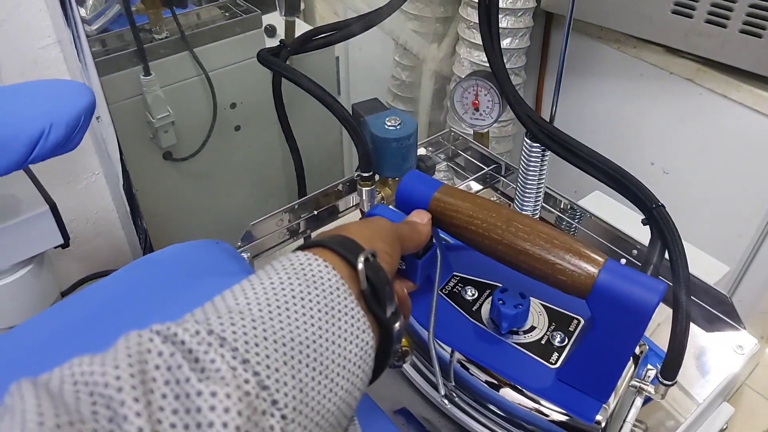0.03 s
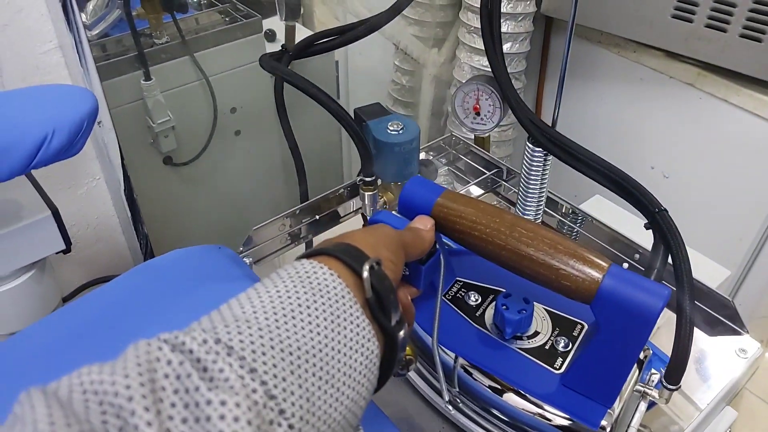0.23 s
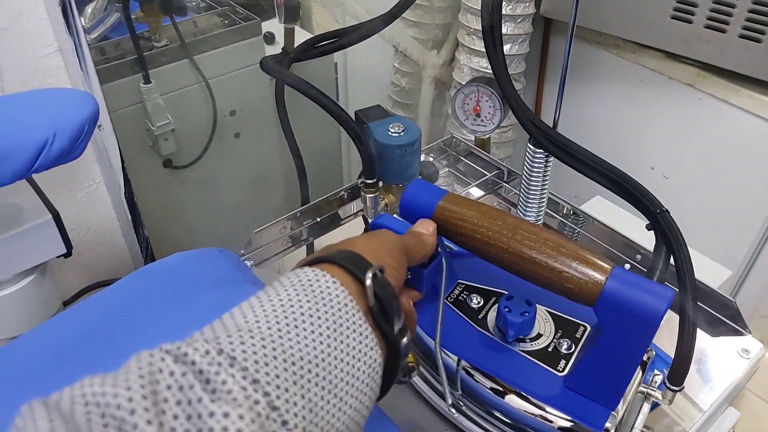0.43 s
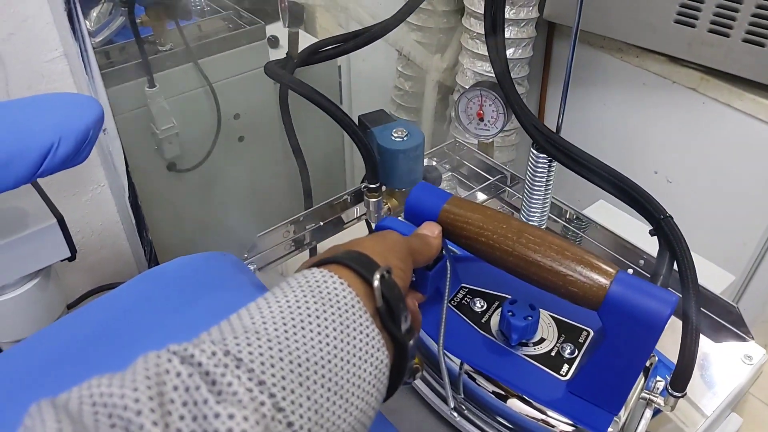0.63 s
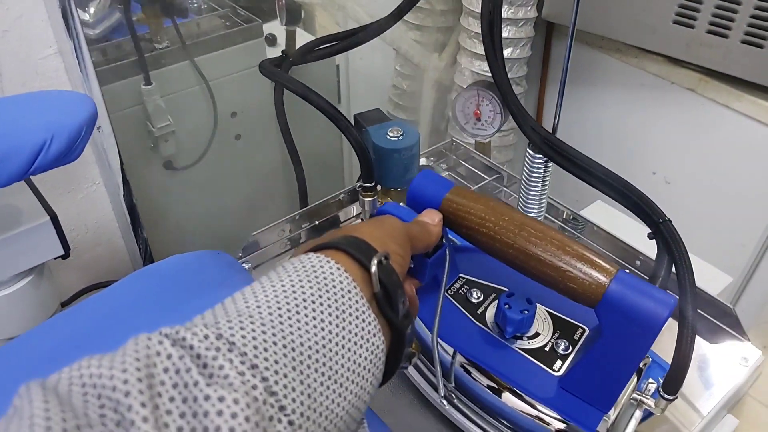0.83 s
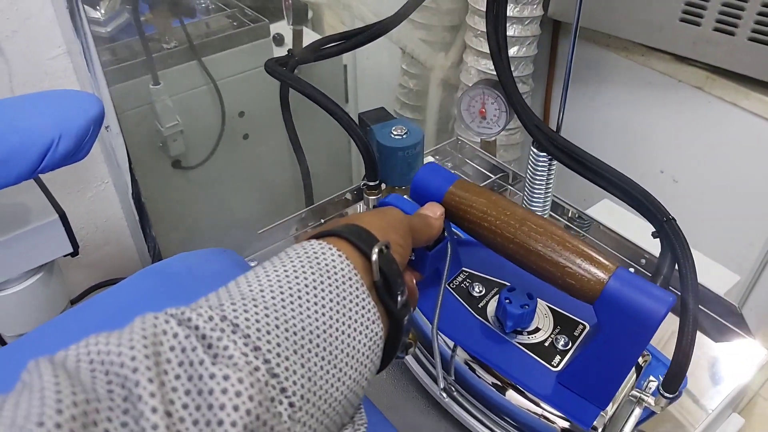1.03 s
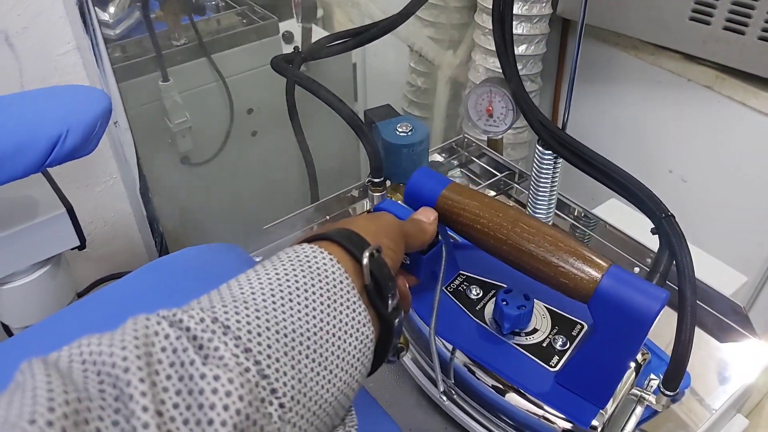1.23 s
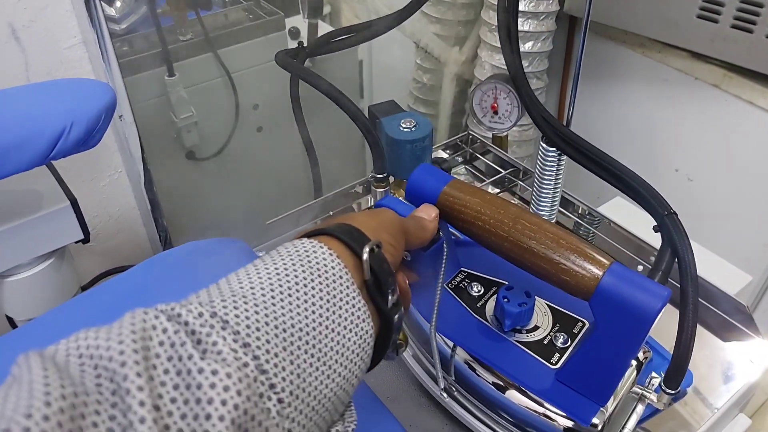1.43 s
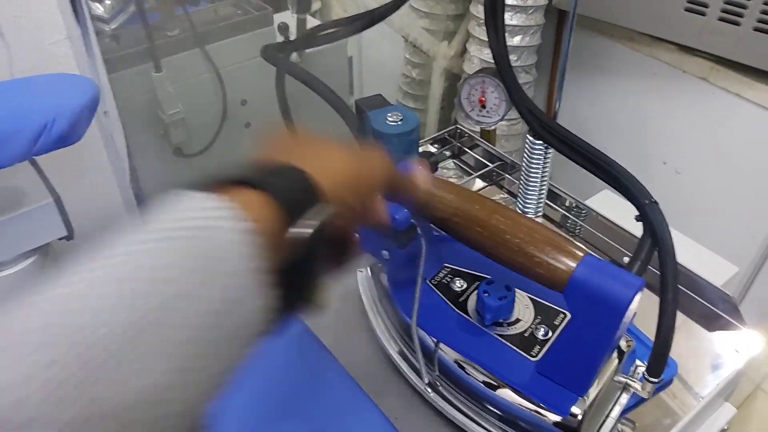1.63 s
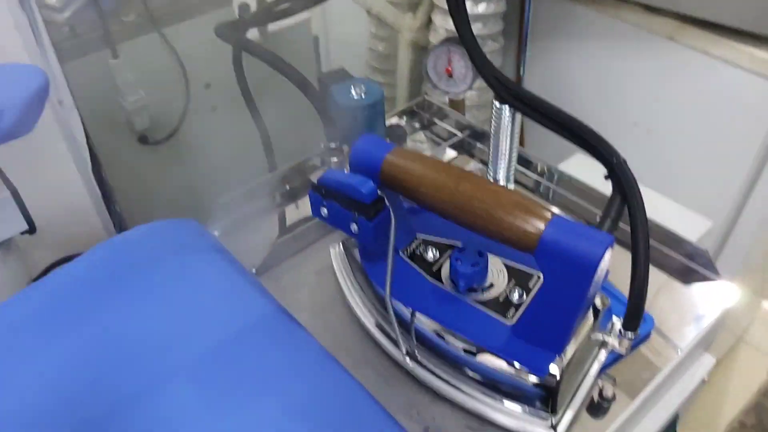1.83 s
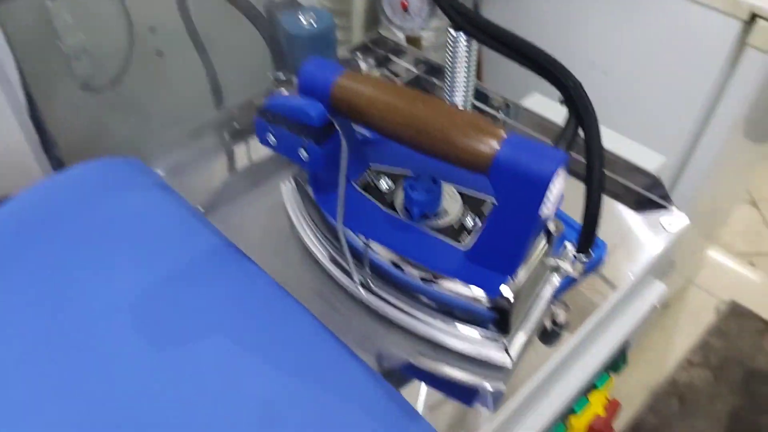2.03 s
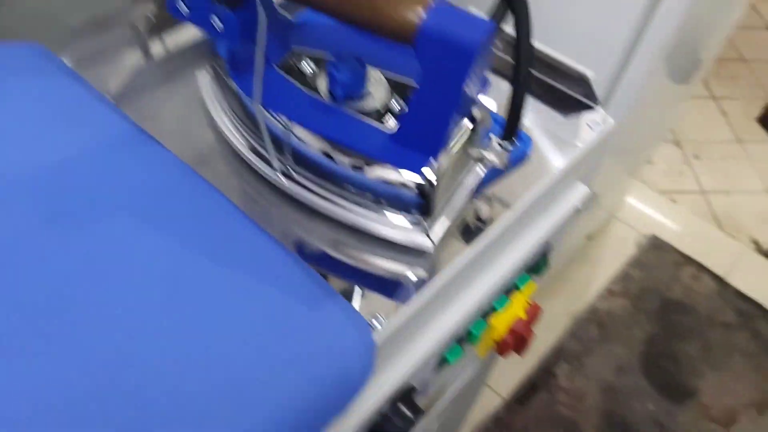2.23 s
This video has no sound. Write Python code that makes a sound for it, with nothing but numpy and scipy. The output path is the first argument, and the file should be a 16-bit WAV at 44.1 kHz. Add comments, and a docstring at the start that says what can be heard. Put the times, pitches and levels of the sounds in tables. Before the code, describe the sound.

Loud, dense steam hiss from an industrial iron fills the start, close and bright with slight flutter and whistly, hollow coloration. Around 0.8 s it softens a little and shifts in tone. At about 1.65 s the valve shuts and the hiss drains away, treble first, with soft rubs at 1.8-1.9 s. By 2 s only quiet workshop fan rush and wavering motor hum remain.

```python
"""Steam iron in a small workshop

A boiler-fed iron blows a loud, steady hiss close to a hand-held microphone with two ports.
The jet is shaped noise, coloured by the hollows of soleplate and rest; it softens as the iron shifts.
The valve shuts and the steam drains away, treble first. Behind it, fans are a noise bed with a thin
whine, and motors are wavering sines. Swells of band noise are the sleeve and iron rubbing past."""
import sys
import numpy as np
from scipy import signal
from scipy.fft import rfft, irfft
from scipy.io import wavfile
from scipy.ndimage import uniform_filter1d

SR = 44100
rng = np.random.default_rng(int(sys.argv[2]) if len(sys.argv) > 2 else 0)


def pcm_store(signal):
    """Save signal as 16-bit PCM."""
    levels = np.round(np.clip(np.atleast_2d(signal), -1, 1) * 32767)
    wavfile.write(sys.argv[1], SR, levels.astype(np.int16).T)


N = 101297
T = np.arange(N) / SR
SIZE, HOP = 2048, 256  # spectral frames, samples
HZ = np.fft.rfftfreq(SIZE, 1 / SR)
FRAME_S = np.arange(N // HOP + 5)[:, None] * HOP / SR


def amp(db):
    """Decibels to gain."""
    return 10 ** (np.asarray(db) / 20)


def unit(x):
    """Scales to rms 1."""
    return x / np.sqrt(np.mean(x ** 2) + 1e-20)


def read(points):
    """Reads a table over frequency at every bin, on a logarithmic frequency axis."""
    f, value = np.transpose(points)
    return np.interp(np.log(HZ + 1), np.log(f + 1), value)


def wander(rate_hz):
    """Random drift of rms 1, mostly slower than rate_hz."""
    f = np.fft.rfftfreq(N, 1 / SR)
    spectrum = rfft(rng.standard_normal(N)) / (1 + (f / rate_hz) ** 4)
    return unit(irfft(spectrum, N))


def noise(gain, same, phase=0):
    """Stereo noise with a gain over time and frequency; the right port shares part of the left's noise."""
    white = rng.standard_normal((2, (len(FRAME_S) - 1) * HOP))
    left, other = signal.stft(white, nperseg=SIZE, noverlap=SIZE - HOP)[2].transpose(0, 2, 1)
    same = np.clip(same, -1, 1)
    right = (same * left + np.sqrt(1 - same ** 2) * other) * np.exp(-1j * phase)
    frames = np.array([left, right]) * gain
    return signal.istft(frames.transpose(0, 2, 1), nperseg=SIZE, noverlap=SIZE - HOP)[1][:, :N]


# jet colour close to the microphone:
# (frequency [Hz], relative density before the iron shifts [dB], after [dB])
JET_COLOUR = [(200, -27.0, -28), (500, -20.0, -16), (930, -14, -14), (1290, -6.5, -7.0), (1960, -3.5, -2.5),
              (3000, -1, 0.5), (4760, -1.0, 0.5), (6920, -6.0, -5.5), (9000, -5, -7), (10640, -10, -8),
              (13500, -16, -13.5), (15500, -17, -15)]
# peaks and dips of the hollows under the iron:
# (frequency [Hz], width [Hz], lift before the shift [dB], lift after [dB])
HOLLOW_LIFTS = [(1060, 140, -3.5, -2.5), (1594, 70, 0, 4), (1934, 45, 7.5, 8.5), (2103, 44, 6, 9),
                (2280, 130, -2, -4), (2380, 30, 2, 2), (2474, 38, 9, 9.5), (2522, 46, 1.5, 3),
                (2663, 19, 0, 7), (2810, 250, 0.5, -6.5), (3144, 51, 10.5, 6), (3197, 36, 11, 2),
                (3350, 44, 5.5, 5), (3670, 110, 6, -5.5), (3750, 85, -0.5, 3.5), (4200, 41, 5, 8),
                (4130, 310, 4, 4.5), (4710, 390, -1.5, -4.5), (5130, 41, 8.5, 8.5), (5290, 64, 3.5, 6),
                (5620, 25, 6, 11), (5840, 250, -2.5, -7.5), (6636, 160, 6, -0.5), (7040, 200, 5, 4),
                (7480, 240, -14.5, -6.5), (7985, 45, 3, -2), (8970, 340, 5, -0.5), (9770, 300, -3, 4),
                (11230, 470, -7.5, -4), (13200, 400, -1, 2)]
FIRST_DB, LATER_DB = -14, -16.5  # rms before and after the shift, ahead of bass cut and level changes
SHIFT_S, SHIFT_TAKES_S = 0.82, .25  # middle and length of the crossfade
SHUT_S, RING_FADE_S = 1.641, 0.35  # valve shuts; the hollows' colour then fades
JET_LOW_HZ = 170  # the jet has little bass below this
RIPPLE_DB = 2.5  # rms


def jet_colour(shut_s):
    """Turbulent jet through the hollows, rippled by nearby surfaces; the hollows fade as the jet dies."""
    table = np.array(JET_COLOUR)
    first, later = read(table[:, [0, 1]]), read(table[:, [0, 2]])
    ring_first, ring_later = 0, 0
    for hz, width, first_db, later_db in HOLLOW_LIFTS:
        bell = 1 / (1 + (2 * (HZ - hz) / width) ** 2)
        ring_first = ring_first + first_db * bell
        ring_later = ring_later + later_db * bell
    ripple = RIPPLE_DB * rng.standard_normal((2, 2, 1, len(HZ)))  # before and after, for each port
    first = amp(FIRST_DB) * unit(amp(first + ring_first + ripple[0]))
    later = amp(LATER_DB) * unit(amp(later + ring_later + ripple[1]))
    later = later * amp(-ring_later * np.minimum(shut_s / RING_FADE_S, 1))
    shifted = np.clip((FRAME_S - SHIFT_S) / SHIFT_TAKES_S + .5, 0, 1)
    bass_cut = HZ ** 2 / np.hypot(HZ ** 2, JET_LOW_HZ ** 2)
    return ((1 - shifted) * first + shifted * later) * bass_cut


# steam flow at the jet: (time [s], relative level [dB])
STEAM_FLOW = [(0, -0.06), (.25, 0.5), (.58, 0.1), (.72, 0.5), (.86, -0.14), (1.0, -0.1), (1.12, 0.2),
              (1.35, -.5), (1.5, -0.86), (1.64, 0.6)]
# extra level of the top treble: (time [s], relative level [dB])
TOP_TREBLE = [(0, 1.3), (.45, 1.3), (.6, 4.2), (.8, 1.5), (.95, 5), (1.1, -0.5), (1.3, -0.5), (1.64, 1)]
TOP_HZ = 11400  # middle of the rise into the top treble
# draining once the valve is shut: (frequency [Hz], fall [dB/s])
DRAIN_RATE = [(500, 27), (1400, 80), (2500, 94), (5000, 121), (9000, 171), (15000, 183)]
EMPTY_S, EMPTY_DB_PER_S = 1.905, 145  # from here every pitch falls faster by this much
# the jet at the two microphone ports: (frequency [Hz], likeness of left and right [-1 to 1])
PORT_LIKENESS = [(200, .92), (700, .8), (1100, .55), (1900, .62), (2600, .45), (3500, .42), (4300, .56),
                 (5300, .62), (6000, .25), (7000, .68), (7700, .4), (15000, .35)]
# the jet at the two microphone ports: (frequency [Hz], lead of the left [rad])
PORT_PHASE = [(200, 0), (900, .3), (1100, .95), (2000, .9), (2500, .6), (2800, -1), (3200, -3),
              (3700, -3.3), (4400, -3.9), (5000, -5.3), (5700, -5.2), (6300, -7.1), (6650, -6.1),
              (7200, -6), (8200, -5), (8900, -3.6), (9900, -1.5), (10400, .6), (12000, 0), (15000, .9)]
# the jet at the two microphone ports: (frequency [Hz], left minus right [dB])
PORT_BALANCE = [(60, 0.077), (130, 0.5), (290, 0.0), (640, 0.87), (1410, 1), (3100, -1), (6820, -0.71),
                (15000, 0.0)]
FLUTTER_DB, PATCH_DB = 0.62, 1.36  # rms


def steam():
    """Jet turbulence as flickering noise; after the valve shuts the treble drains faster than the bass."""
    shut_s = np.maximum(FRAME_S - SHUT_S, 0)
    colour = jet_colour(shut_s)
    # random patches about 0.12 s long and 430 Hz wide
    patches = rng.standard_normal((len(FRAME_S), len(HZ)))
    patches = uniform_filter1d(patches, size=20, axis=0)
    patches = unit(uniform_filter1d(patches, size=20, axis=1))
    drain = read(DRAIN_RATE) * shut_s + EMPTY_DB_PER_S * np.maximum(FRAME_S - EMPTY_S, 0)
    sides = np.array([.5, -.5])[:, None, None] * read(PORT_BALANCE)
    treble = 1 - 1 / (1 + (HZ / TOP_HZ) ** 10)
    top = np.interp(FRAME_S, *np.transpose(TOP_TREBLE)) * treble
    flow = np.interp(FRAME_S, *np.transpose(STEAM_FLOW))
    level = flow + top - drain + PATCH_DB * patches + sides
    jet = noise(colour * amp(level), read(PORT_LIKENESS), read(PORT_PHASE))
    return jet * amp(FLUTTER_DB * wander(rate_hz=70))


# fan rush in the workshop: (frequency [Hz], relative density [dB])
FAN_RUSH = [(20, -36), (45, -15), (135, -10.5), (270, -10.5), (400, -10), (620, -16.5), (740, -13),
            (870, -16.5), (1000, -13.5), (1350, -19), (1700, -22), (2800, -26.5), (6000, -38.5),
            (12000, -45.5), (15500, -63)]
# workshop and rubs at the two ports: (frequency [Hz], likeness of left and right [-1 to 1])
ROOM_LIKENESS = [(50, 0.9), (300, 0.89), (1000, 0.39), (3000, 0.8), (12000, .3)]
# motor tones: (frequency [Hz], mean level [dB], drop before the tones come forward at 1.89 s [dB])
MOTOR_TONES = [(47.3, -62.5, -2), (119, -60, 0.5), (138, -61.5, 0), (176, -61, 0.5), (292.8, -54.5, 1),
               (982, -55.5, 3), (1032, -56.5, 13), (1077, -84, 7), (1222, -63.5, 3), (1620, -65, 3.5),
               (1680, -74, 0)]
RUSH_DB = -45.5  # rms
WHINE_HZ, WHINE_WIDTH_HZ, WHINE_DB = 12050, 120, -86  # narrow noise band: centre, spread, rms
HUM_WAVER_DB, HUM_DRIFT_HZ = 1, 2.5  # rms of each tone's level and pitch drift
TONES_RISE_S, TONES_RISE_TAKES_S = 1.89, 0.21  # middle and length of the rise of the motor tones


def workshop():
    """Rush of fans and a thin whine as noise, and motors as sines wavering in pitch and level."""
    rush = amp(RUSH_DB) * unit(amp(read(FAN_RUSH)))
    whine = amp(WHINE_DB) * unit(np.exp(-.5 * ((HZ - WHINE_HZ) / WHINE_WIDTH_HZ) ** 2))
    out = noise(np.hypot(rush, whine), read(ROOM_LIKENESS))
    held_back = np.clip((TONES_RISE_S - T) / TONES_RISE_TAKES_S + .5, 0, 1)
    for hz, db, held_back_db in MOTOR_TONES:
        turns = np.cumsum(hz + HUM_DRIFT_HZ * wander(rate_hz=7.8)) / SR + rng.random()
        level = db - held_back_db * held_back + HUM_WAVER_DB * wander(rate_hz=5.4)
        out = out + np.sqrt(2) * amp(level) * np.sin(2 * np.pi * turns)
    return out


# soft rubs and puffs by the microphone as the arm and iron move:
# (time [s], half length [s], centre [Hz], width [octaves], peak level [dB])
RUBS = [(0.021, 0.022, 135, .25, -46.5), (0.271, .06, 122, .25, -51), (1.777, 0.016, 1300, 0.15, -35),
        (1.78, 0.019, 480, 0.51, -41), (1.79, 0.044, 2350, .06, -38.5), (1.832, .07, 860, 0.084, -49.5),
        (1.888, 0.025, 437, .5, -41)]


def brushes():
    """Soft swells of rubbing noise, each in its own band, as the arm and iron move by the microphone."""
    out = np.zeros((2, N))
    for s, half, hz, octaves, db in RUBS:
        band = unit((1 + .5 * (np.log2((HZ + 1) / hz) / octaves) ** 2) ** -2)
        swell = np.exp(-.5 * ((T - s) / half) ** 2)
        out += amp(db) * swell * noise(band, read(ROOM_LIKENESS))
    return out


def scene():
    """Steam, workshop and handling together."""
    return steam() + workshop() + brushes()


EDGE_HZ = 15750


def record(dry):
    """The recorder's band limit: a steep low-pass at EDGE_HZ."""
    lowpass = signal.firwin(801, EDGE_HZ, window=("kaiser", 9), fs=SR)
    return signal.oaconvolve(dry, lowpass[None], "same")


dry = scene()
out = record(dry)
pcm_store(out)
```